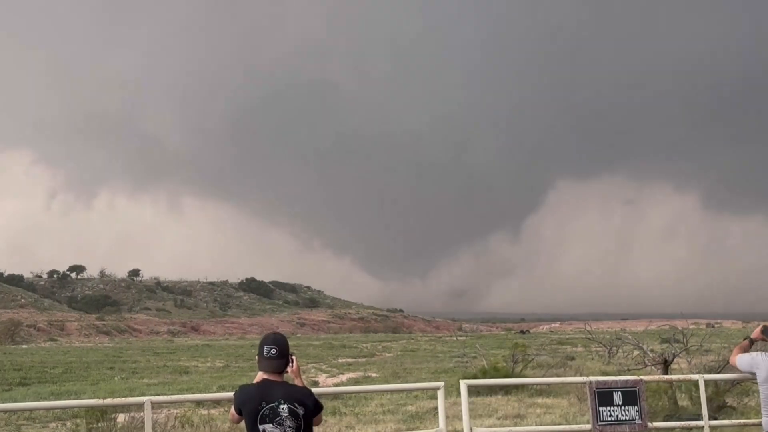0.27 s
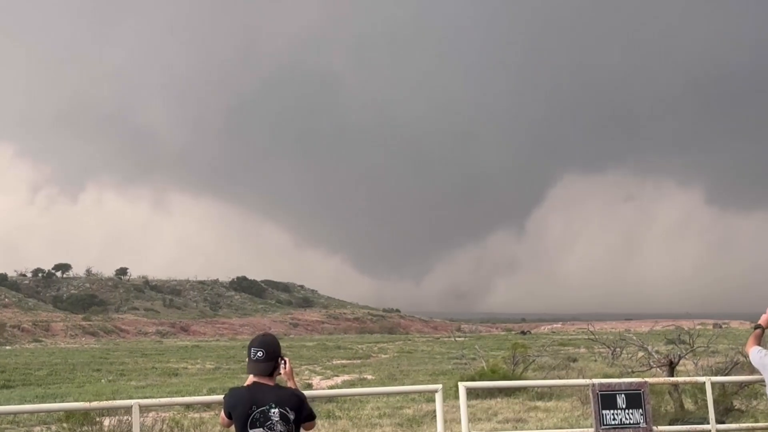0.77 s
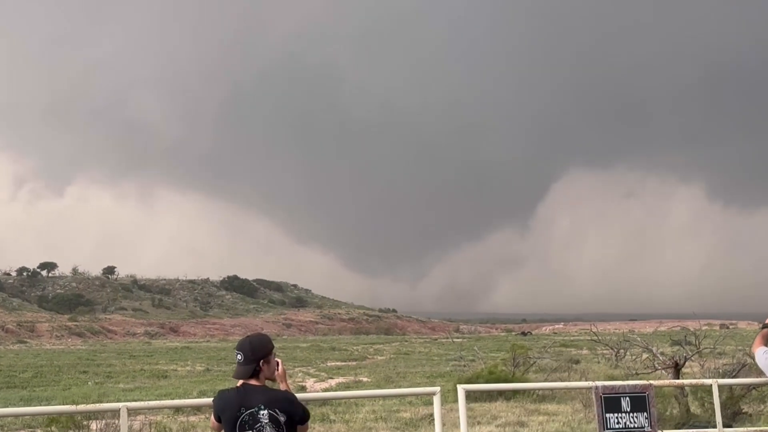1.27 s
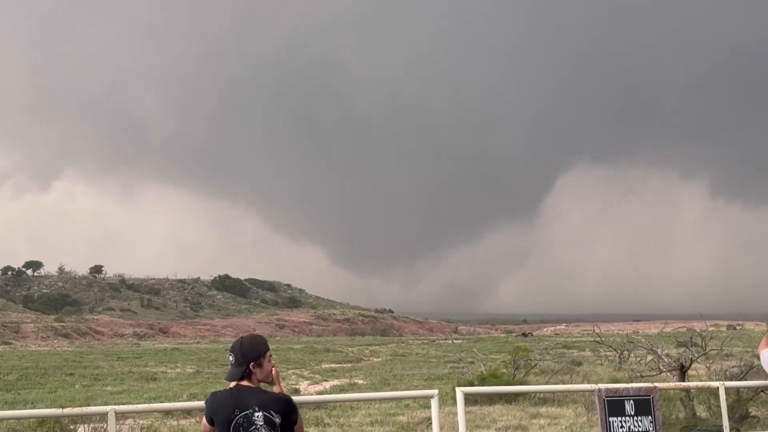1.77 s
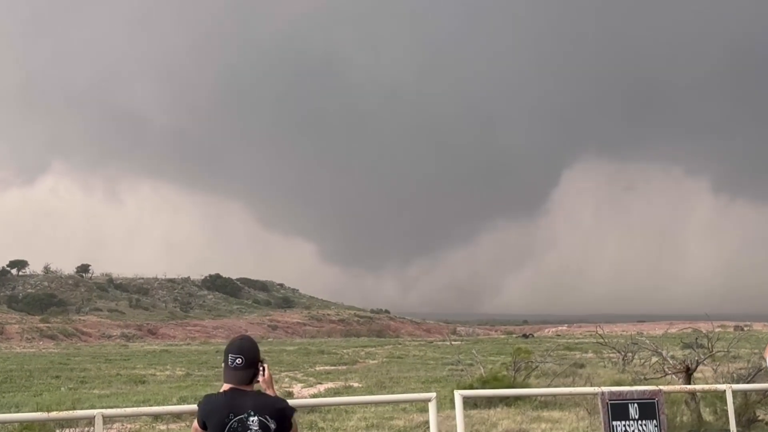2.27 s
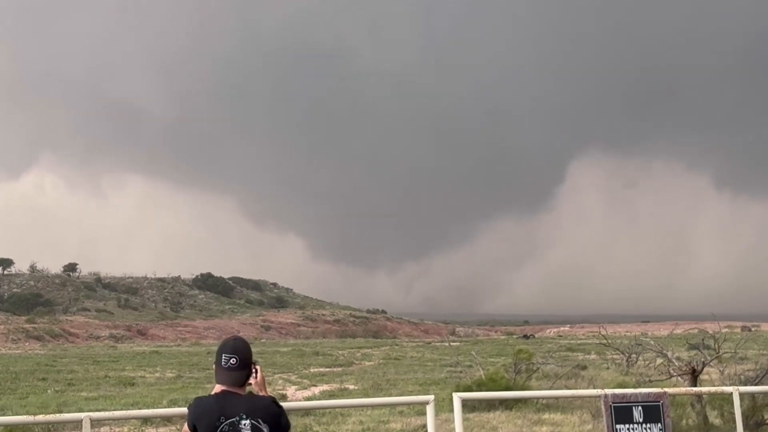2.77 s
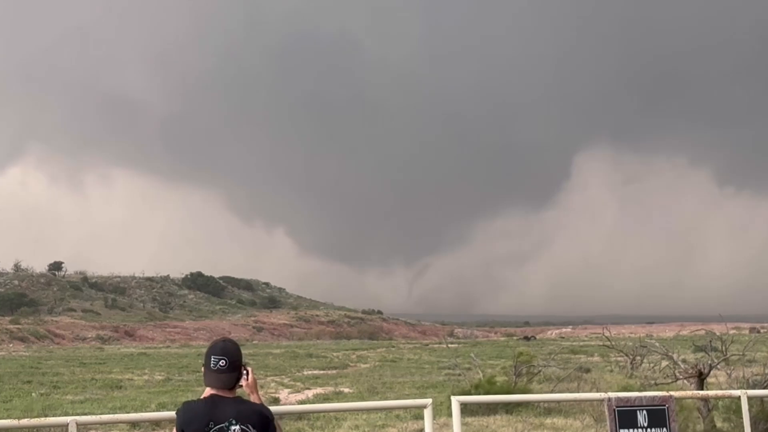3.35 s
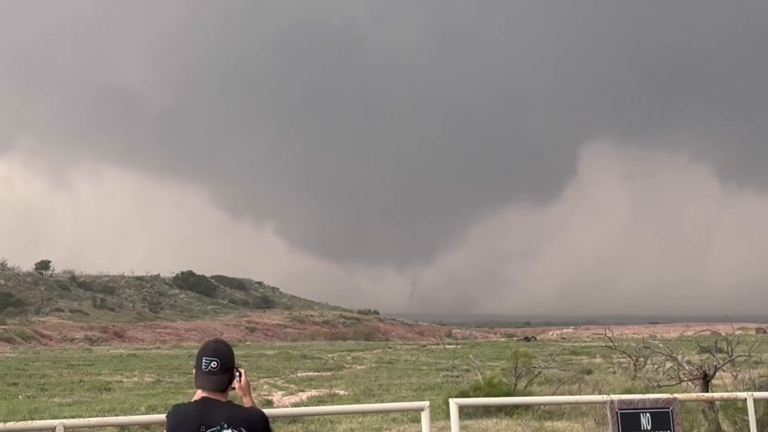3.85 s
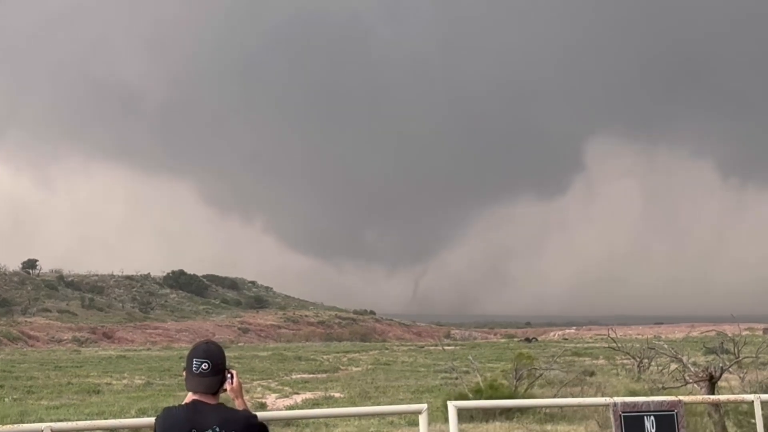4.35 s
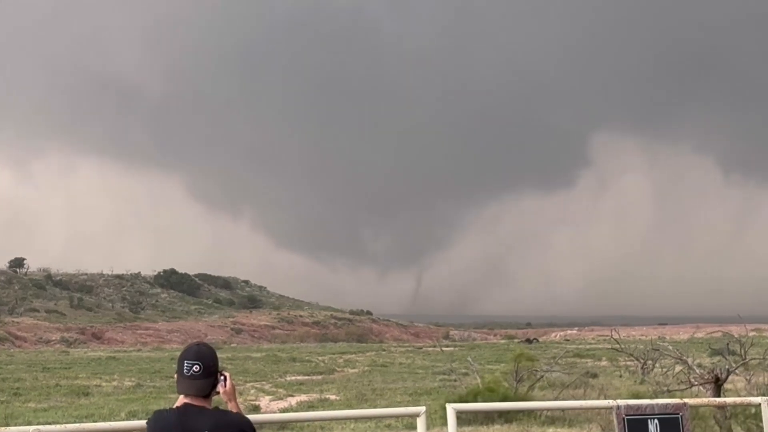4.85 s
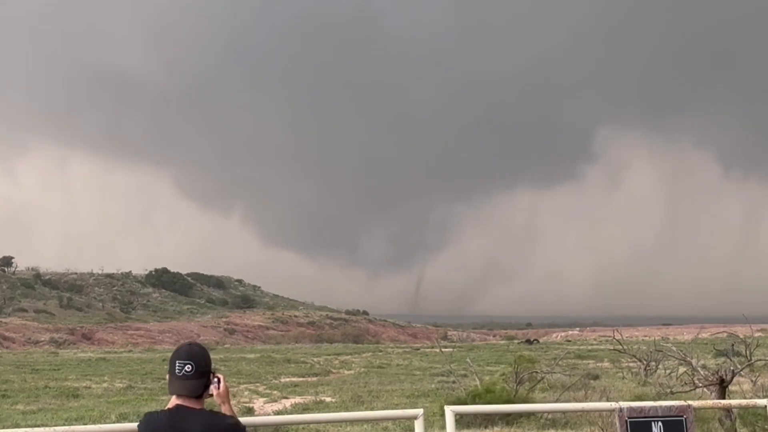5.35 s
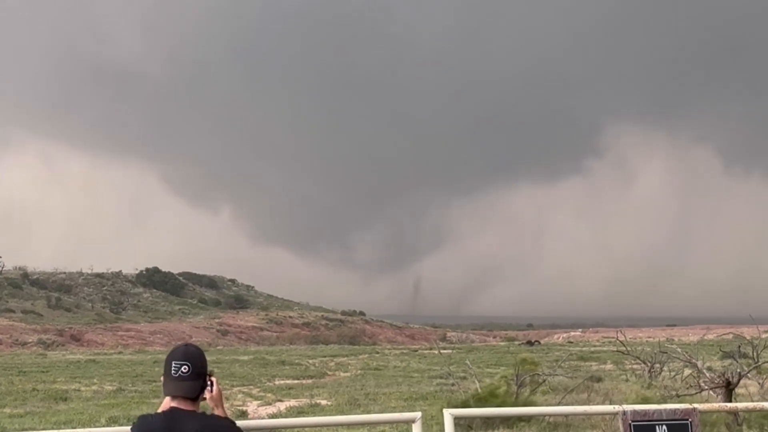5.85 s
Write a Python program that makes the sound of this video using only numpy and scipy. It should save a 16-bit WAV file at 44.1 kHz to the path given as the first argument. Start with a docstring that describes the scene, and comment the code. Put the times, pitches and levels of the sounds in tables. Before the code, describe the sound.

Storm wind blows across open grassland and rumbles unevenly on a hand-held stereo microphone. Light dry taps, like first raindrops on cloth, fall close by at the start. The wind swells into hard, popping buffets, eases while a few more taps land, then buffets again near the end. Behind it, air rushes softly over the land and grass hisses, and late on a distant bird chirps very faintly.

```python
"""Open grassland in a storm wind, on a hand-held stereo microphone.
Eddies rumble right at the ports and twice swell into hard, popping buffets. Behind them the wind
rushes over the land and hisses in the nearby grass. Light dry taps, like first raindrops on taut
cloth, fall close to the microphone; late on, a bird whistles faintly, far off."""
import sys
import numpy as np
from scipy import signal
from scipy.fft import rfft, irfft
from scipy.io import wavfile
from scipy.ndimage import uniform_filter1d, minimum_filter1d

SR = 44100
rng = np.random.default_rng(int(sys.argv[2]) if len(sys.argv) > 2 else 0)


def waveform_to_disk(signal):
    """Save audio, clipped to [-1, 1], as 16-bit WAV at the path in sys.argv[1]."""
    frames = np.transpose(np.atleast_2d(signal))
    scaled = np.clip(frames, -1, 1) * 32767
    samples = np.round(scaled).astype(np.int16)
    wavfile.write(sys.argv[1], SR, samples)


N = 269010
T = np.arange(N) / SR
HZ = np.fft.rfftfreq(N, 1 / SR)

# Wind on the microphone, how alike the two ports hear it: f/Hz, likeness/0-1
WIND_LIKENESS = [(30, .995), (48, .99), (56, .965), (64, .8), (110, .72), (300, .72), (500, .68),
                 (1000, .52)]
# Sound arriving through the air, how alike the two ports hear it: f/Hz, likeness/0-1
AIR_LIKENESS = [(300, 0.13), (700, 0.018), (1300, 0.18), (2400, 0.89), (4000, 0.91), (7000, 1),
                (10000, 0.9), (15000, .9)]
# Sound arriving through the air, its stereo balance: f/Hz, left over right/dB
AIR_PAN = [(300, 5), (700, -0.5), (1300, 3.5), (2400, 0), (4000, 0)]


def amp(db):
    """Decibels to gain."""
    return 10 ** (np.asarray(db) / 20)


def unit(x):
    """Scales to rms 1."""
    return x / np.sqrt(np.mean(x ** 2) + 1e-20)


def curve(points, hz=HZ):
    """Joins points by straight lines on a log-frequency axis."""
    f, value = np.transpose(points)
    return np.interp(np.log(hz + 1), np.log(f), value)


def fader(table, column):
    """One dB column of a timed table as a gain for each sample."""
    rows = np.array(table)
    return amp(np.interp(T, rows[:, 0], rows[:, column]))


def add(mix, s, sound):
    """Mixes a stereo sound in at time s."""
    part = mix[:, max(round(s * SR), 0):][:, :sound.shape[1]]
    part += sound[:, :part.shape[1]]


def wander(rate_hz):
    """Random drift of rms 1, with changes up to the given rate."""
    return unit(irfft(rfft(rng.standard_normal(N)) / (1 + (HZ / rate_hz) ** 4), N))


def noise(db, likeness, balance_db=0, size=N):
    """Stereo noise of rms 1 with a given spectrum and likeness of the two ports."""
    same = np.clip(curve(likeness, np.fft.rfftfreq(size, 1 / SR)), -1, 1)
    mid, side = rfft(rng.standard_normal((2, size))) * np.sqrt([1 + same, 1 - same])
    ports = np.array([(mid + side) * amp(balance_db / 2), (mid - side) * amp(-balance_db / 2)])
    return unit(irfft(ports * amp(db), size))


def steadied(x, span_s):
    """Takes the slow swells out of a noise and keeps its quick flutter."""
    power = uniform_filter1d((x ** 2).mean(0), max(int(span_s * SR), 1))
    return unit(x / np.sqrt(uniform_filter1d(power, max(int(span_s * SR / 2), 1)) + 1e-9))


def wind(rumble_db=-1.0, flutter_db=-2.0, surge_db=2.5, lumps_db=1.5, crisp_hz=270, crisp_db=-3.0):
    """At the ports, large eddies throb deeply; smaller ones flutter, the smallest most raggedly."""
    # Wind strength at the microphone: t/s, rumble level/dB, flutter level/dB
    gusts = [(0.0, -22.5, -27.0), (0.07, -25, -27), (0.15, -16.5, -23.5), (0.24, -24, -25),
             (0.4, -23, -27.3), (0.66, -23, -24.3), (0.8, -22, -23), (1.03, -28, -27), (1.15, -18.4, -25.6),
             (1.24, -24.5, -27.9), (1.42, -16.5, -27.5), (1.56, -26.5, -30), (1.8, -22.5, -30),
             (1.93, -18.5, -27), (2.0, -26, -27), (2.07, -19.5, -22), (2.21, -24, -24.5),
             (2.29, -16.5, -23), (2.44, -16, -21.5), (2.5, -20, -25), (2.57, -15, -21), (2.7, -15, -22),
             (2.76, -17, -23), (2.795, -9, -21), (2.85, -15, -22), (2.95, -16, -22), (3.13, -21.5, -25),
             (3.28, -18, -24), (3.37, -17.5, -24), (3.52, -19, -22.5), (3.85, -23.5, -27),
             (4.02, -25.5, -28.5), (4.13, -19.5, -24), (4.21, -25, -22), (4.275, -15.5, -21.5),
             (4.34, -25, -27.7), (4.8, -22, -29.5), (5.16, -20.5, -31), (5.27, -18.5, -26),
             (5.38, -24.5, -29), (5.49, -20, -23), (5.64, -24, -28.5), (5.76, -20.5, -22.5),
             (5.9, -22, -23), (5.98, -29, -26), (6.06, -22, -20.5)]
    # Spectrum of the large eddies: f/Hz, relative level/dB
    rumble_spectrum = [(10, -42), (22, -25), (28, -13), (36, -5.5), (43, -5.5), (49, -2.5), (55, 4.5),
                       (60, 1.5), (69, -9.5), (80, -8.5), (100, -16), (160, -34), (400, -70), (1500, -120)]
    # Spectrum of the smaller eddies: f/Hz, relative level/dB
    flutter_spectrum = [(30, -10), (70, -3), (110, 2.5), (160, -0.5), (230, -7), (320, -13.5), (470, -23),
                        (650, -39), (1000, -37.5), (2500, -91.5), (8000, -100)]
    rumble = steadied(noise(curve(rumble_spectrum), WIND_LIKENESS), span_s=0.092)
    rumble *= unit(amp(surge_db * wander(rate_hz=27.4)))
    lumps = wander(rate_hz=25)
    flutter = steadied(noise(curve(flutter_spectrum), WIND_LIKENESS), span_s=0.031)
    flutter *= unit(amp(lumps_db * lumps))
    soft = irfft(rfft(flutter) / (1 + (HZ / crisp_hz) ** 6), N)
    ragged = unit(amp(2.5 * np.clip(lumps, -2, 2)))
    crisp = amp(crisp_db) * (flutter - soft) * ragged
    return (amp(rumble_db) * rumble * fader(gusts, column=1)
            + amp(flutter_db) * (soft + crisp) * fader(gusts, column=2))


def grass(rush_db=-43, hiss_db=-55.5, usual_breeze_db=-53.5, stir_db=1.03, crackle_db=0.3):
    """A broad rush from far off and a fine, crackling hiss of nearby blades swell with the breeze."""
    # Wind strength over the land: t/s, far level/dB, near level/dB
    breeze = [(0, -49, -52), (.48, -59.5, -61), (.54, -52.5, -58), (.8, -54.5, -59.5), (1.48, -58, -59),
              (1.66, -63, -64), (1.9, -53, -57), (1.98, -60, -61.5), (2.32, -51.5, -54), (2.38, -56, -56.5),
              (2.5, -55.5, -55), (2.76, -48, -51), (2.96, -49, -52), (3.2, -62, -64), (3.38, -52, -50.5),
              (3.72, -54.5, -53), (3.81, -57.5, -61), (3.9, -63, -61.5), (4.24, -46, -53),
              (4.43, -59.5, -66), (4.54, -58, -55.5), (4.9, -62.5, -58.5), (5.32, -62, -61.3),
              (5.5, -60.5, -59), (5.65, -58.5, -56), (5.84, -67, -63), (6.06, -53.5, -63)]
    # Spectrum of the distant rush: f/Hz, relative level/dB
    rush_spectrum = [(100, -19), (300, 2.5), (500, 16), (750, 5), (1000, 4.5), (1350, 1), (1700, -3.5),
                     (2400, -10), (3200, -14.5), (5000, -19), (9000, -24), (16000, -46.5)]
    # Spectrum of the nearby blades: f/Hz, relative level/dB
    hiss_spectrum = [(300, 4), (1000, 10.5), (2000, 4), (3500, -2.5), (5000, -5.5), (7000, -3.5),
                     (8500, -6), (10000, -5), (11500, -4.5), (13000, -8), (15000, -6), (16000, -20.5)]
    stir = amp(stir_db * wander(rate_hz=13) - usual_breeze_db)
    far = (stir * fader(breeze, column=1)) ** 0.85  # dB of sound for each dB of breeze
    near = (stir * fader(breeze, column=2)) ** 0.79
    rush = noise(curve(rush_spectrum), AIR_LIKENESS, curve(AIR_PAN)) * amp(1.1 * wander(rate_hz=38))
    hiss = noise(curve(hiss_spectrum), AIR_LIKENESS, curve(AIR_PAN)) * amp(0.77 * wander(rate_hz=160))
    crackle = unit(amp(crackle_db * wander(rate_hz=700)))
    return amp(rush_db) * rush * far + amp(hiss_db) * hiss * crackle * near


def taps(rise_s=0.00063, ring_rise_s=0.0033, decay_s=0.016, tail_s=0.046, tail_db=-17, low_hz=1100):
    """Close by, each tap is a grainy spatter with a faint tail and a hollow ring of damped modes."""
    # Taps, in relative levels: t/s, spatter/dB, treble/dB, ring/dB, lift of the modes below low_hz/dB
    hits = [(.018, -36, -26, -51, 3), (0.118, -43.5, -14, -46, -5), (.154, -41.5, -7, -38, -4),
            (0.173, -33, -26.5, -41, 11), (.304, -45, -30, -62, 2), (0.377, -46.5, -26, -66, 0),
            (0.401, -45, -28, -60, 0), (.52, -51, -16, -41, 2), (0.556, -41, -21, -42, 5),
            (.624, -51, -27, -50, 6), (.772, -38, -36, -49, 11), (0.799, -48, -23, -58, 0),
            (.855, -48.5, -17, -62, 0), (.926, -60, -17, -62, 0), (.949, -48, -29, -60, 0),
            (1.026, -56, -21, -60, 0), (1.48, -32, -38, -30.5, 1), (1.574, -44.5, -32, -61, 0),
            (1.61, -39.5, -23, -31.5, -10), (1.708, -37, -41, -43, 4), (1.728, -50, -24, -50, 10),
            (3.54, -29.5, -31.5, -37.5, 10.5), (3.775, -50.5, -5, -60, 0), (3.814, -36, -31, -37.5, -14),
            (3.85, -42.5, -34, -51, 14), (3.926, -30.5, -26, -30, 0), (4.124, -32.5, -30, -45, -1),
            (4.136, -40, -21, -57, 0), (4.316, -30.5, -32.5, -30, 4), (4.495, -45, -35, -43.5, 0)]
    # Modes that a tap rings with: f/Hz, relative level/dB, t60/s
    modes = [(560, -3, .04), (865, 1.5, .04), (1010, -4.5, .03), (1305, 6, .04), (1430, -5, .034),
             (1770, -13.5, .04), (2295, -15, .045), (3590, -24, .05), (4340, -22, .06), (5220, -21, .06),
             (7550, -21, .05)]
    # Spectrum of the spatter: f/Hz, relative level/dB
    spatter_spectrum = [(150, -9), (500, -1.5), (900, 7.5), (1400, 7), (2000, 2.5), (2900, -4.5),
                        (3600, -4), (5000, -7), (7500, -9.5), (9500, -14.5), (12000, -19), (15500, -24)]
    out, size = np.zeros((2, N)), 2 ** 13
    hz, t = np.fft.rfftfreq(size, 1 / SR), np.arange(size) / SR
    treble_shelf = hz ** 2 / (hz ** 2 + 2800 ** 2)
    attack = 1 - np.exp(-t / rise_s)
    envelope = attack * (np.exp(-(t / decay_s) ** 1.25) + amp(tail_db) * np.exp(-t / tail_s))
    build = 1 - np.exp(-(t / ring_rise_s) ** 2)  # the ring builds just after the spatter
    for s, db, treble_db, ring_db, low_db in hits:
        colour_db = curve(spatter_spectrum, hz) + 0.9 * (treble_db + 29.0) * treble_shelf
        grain = unit(amp(0.57 * unit(uniform_filter1d(rng.standard_normal(size), size=40))))
        spatter = grain * noise(colour_db, AIR_LIKENESS, curve(AIR_PAN, hz), size=size)
        detune = rng.uniform(0.99, 1.025)  # each tap lands elsewhere and rings a little higher or lower
        ring = np.zeros(size)
        for f, mode_db, t60 in modes:
            fade = amp(mode_db + low_db * (f < low_hz) - 60 * t / t60)
            ring += fade * np.sin(2 * np.pi * (detune * f * t + rng.random()))
        knock = amp(ring_db) * build * ring * amp([[2.5], [0]])  # a little to the left
        add(out, s - .001, amp(db - 4.5) * envelope * spatter + knock)
    return out


def buffets(rise_s=0.0016, lead_s=.01, lag_s=0.00929, lag_hz=190, knee_share=0.023, gain_db=7.0):
    """An eddy hits the ports as a quick swell of low noise that falls off steeply above its edge."""
    # Bursts of turbulence: onset t/s, relative level/dB, nominal decay/s, upper edge f/Hz
    bursts = [(1.983, -25.5, 0.011, 680), (2.087, -24.5, 0.024, 416), (2.362, -22, 0.009, 294),
              (2.45, -18, 0.01, 710), (2.527, -19.5, 0.017, 600), (2.544, -26, .005, 800),
              (2.568, -22, 0.018, 640), (2.596, -25, 0.015, 680), (2.633, -23.5, 0.021, 480),
              (2.858, -13, 0.019, 475), (2.886, -21, 0.02, 570), (2.903, -24.5, 0.03, 480),
              (2.978, -21, 0.0064, 1210), (3.014, -25.5, 0.0097, 810), (3.199, -31.5, 0.014, 1050),
              (3.232, -26.5, 0.027, 500), (3.258, -21, 0.0047, 603), (5.312, -30, 0.0079, 280),
              (5.761, -23.5, 0.012, 405), (5.813, -18.5, 0.012, 610), (5.845, -21.5, 0.023, 355),
              (5.870, -21, 0.0065, 843), (6.002, -25, 0.022, 423)]
    out, size = np.zeros((2, N)), 2 ** 13
    hz, t = np.fft.rfftfreq(size, 1 / SR) + 1, np.arange(size) / SR
    phase_lag = 2 * np.pi * lag_s * lag_hz * np.arctan(hz / lag_hz)  # the deep part comes last
    age = np.maximum(t - lead_s, 0)
    low_cut = 1 / np.hypot(1, (80 / hz) ** 3)
    for s, db, decay_s, edge_hz in bursts:
        shape = low_cut / np.hypot(1, hz / (knee_share * edge_hz)) / np.hypot(1, (hz / edge_hz) ** 3.3)
        eddy = steadied(noise(20 * np.log10(shape), WIND_LIKENESS, size=size), span_s=0.36)
        swell = (1 - np.exp(-age / rise_s)) * np.exp(-(age / (1.5 * decay_s)) ** 0.92)
        high_cut = 1 / np.hypot(1, (hz / (2 * edge_hz)) ** 4)
        thump = irfft(rfft(eddy * swell) * high_cut * np.exp(-1j * phase_lag))
        add(out, s - lead_s, amp(db + gain_db) * thump)
    return out


def pops(rise_s=0.0051, glide_s=0.00662, roughness=0.29, port_spread_turns=0.058):
    """A tight eddy bursts on the ports: a few uneven pressure swings that sink from a pop to a thud."""
    # Tight eddies inside the gusts: t/s, level/dB, decay/s, starting f/Hz, final f/Hz
    eddies = [(1.985, -19.5, 0.0086, 490, 85), (2.093, -11, 0.0087, 420, 101),
              (2.119, -13, 0.0064, 397, 120), (2.155, -23, 0.0095, 370, 110),
              (2.221, -14.5, .009, 390, 120), (2.268, -16.5, 0.0093, 380, 191),
              (2.366, -18, 0.014, 345, 150), (2.452, -6, 0.028, 518, 120.5),
              (2.463, -3.5, 0.021, 128, 88.5), (2.514, -10, .009, 340, 85), (2.531, -8, 0.009, 518, 129),
              (2.534, -3, 0.012, 195, 106), (2.543, -7.5, 0.0042, 880, 295),
              (2.552, -11.5, 0.016, 482, 122), (2.573, -8, 0.029, 410, 123), (2.594, -3, 0.013, 363, 132),
              (2.603, -4, 0.011, 634, 110), (2.639, -13, 0.016, 515, 180), (2.864, -5.5, 0.019, 417, 119),
              (2.869, 0, 0.018, 160, 105), (2.884, -3, 0.0078, 594, 149), (2.893, -6, 0.0043, 700, 200),
              (2.9, -8, 0.04, 247, 97), (2.974, -11, 0.0081, 305, 100), (2.986, -13, 0.034, 493, 129),
              (3.062, -12.5, 0.0069, 376, 140), (3.095, -17, .007, 360, 140),
              (3.122, -8.5, 0.014, 308, 120), (3.257, -12, 0.0091, 325, 100), (4.18, -16, 0.013, 380, 130),
              (4.25, -17, 0.013, 342, 90), (5.421, -23, 0.0088, 380, 150), (5.461, -17, 0.021, 470, 120),
              (5.689, -20, 0.011, 380, 170), (5.718, -18, 0.015, 338, 109), (5.76, -16.5, 0.017, 377, 110),
              (5.816, -10, 0.012, 460, 301), (5.831, -6, 0.015, 844, 200), (5.833, 2, .013, 196, 95),
              (5.862, -11, 0.015, 356, 220), (5.871, -2.5, 0.023, 151, 91), (5.881, 0, 0.012, 525, 100),
              (5.941, -11, 0.015, 250, 110.6), (6.006, -10.5, 0.0075, 403, 130)]
    out, size = np.zeros((2, N)), 2 ** 12
    hz, t = np.fft.rfftfreq(size, 1 / SR), np.arange(size) / SR
    rough_spectrum_db = -10 * np.log10(1 + (hz / 220) ** 6)
    for s, db, decay_s, start_hz, end_hz in eddies:
        pitch_hz = end_hz + (start_hz - end_hz) * np.exp(-(t / glide_s) ** 1.63)
        turns = np.cumsum(pitch_hz) / SR + rng.random()
        swings = np.sin(2 * np.pi * (turns + port_spread_turns * rng.standard_normal((2, 1))))
        swell = (1 - np.exp(-(t / rise_s) ** 2)) * np.exp(-(t / decay_s) ** 2)
        rough = roughness * noise(rough_spectrum_db, WIND_LIKENESS, size=size)
        add(out, s, amp(db) * swell * (swings + rough))
    return out


def swishes(width_octaves=0.4):
    """A passing eddy draws a soft, narrow band of hiss from a patch of grass."""
    # Eddies crossing the grass: peak t/s, half length/s, level/dB, centre f/Hz
    passes = [(2.76, .05, -47, 850), (4.74, 0.073, -62, 2000), (5.542, .07, -61, 2050),
              (5.654, .05, -58, 1900)]
    out = np.zeros((2, N))
    for s, half_s, db, centre_hz in passes:
        octaves_off = np.log2((HZ + 1) / centre_hz)
        band_db = -20 * np.log10(1 + (octaves_off / width_octaves) ** 4)
        swell = np.exp(-((T - s) / half_s) ** 2 / 2)
        out += amp(db) * swell * noise(band_db, AIR_LIKENESS)
    return out


def bird(gain_db=-8, fade_s=0.0068, blur_hz=220):
    """A far bird's faint gliding chirps, blurred by distance and moving air into narrow bands."""
    # Whistled glides, one list a chirp: t/s, f/Hz, relative level/dB
    chirps = [
        [(4.503, 2850, -62), (4.517, 3000, -57), (4.54, 3100, -66)],
        [(4.508, 3700, -61), (4.525, 3800, -58), (4.565, 3780, -61), (4.6, 3900, -62), (4.63, 4000, -68)],
        [(4.55, 4550, -68), (4.6, 4650, -62), (4.72, 4500, -69)],
        [(5.9, 4100, -72), (5.945, 4100, -65), (5.98, 4000, -67), (6.02, 4120, -62), (6.09, 4050, -65)],
        [(5.985, 2800, -68), (6.03, 2950, -62), (6.09, 3050, -63)],
    ]
    out = np.zeros((2, N))
    for chirp in chirps:
        s, hz, db = np.transpose(chirp)
        phase = 2 * np.pi * np.cumsum(np.interp(T, s, hz)) / SR
        tone = wander(blur_hz) * np.sin(phase) + wander(blur_hz) * np.cos(phase)
        gate = np.clip(np.minimum(T - s[0], s[-1] - T) / fade_s, 0, 1)
        out += gate * amp(np.interp(T, s, db) + gain_db) * tone
    return out


def limiter(x, ceiling, size):
    """The gain dips smoothly around any peak above the ceiling."""
    needed = ceiling / np.maximum(abs(x).max(0), ceiling)
    held = minimum_filter1d(needed, 2 * size)
    return x * uniform_filter1d(uniform_filter1d(held, size), size)


def scene():
    """Wind on the microphone, with the land and its small sounds behind it."""
    return wind() + buffets() + pops() + grass() + swishes() + taps() + bird()


def record(dry):
    """Low cut, a left-right phase offset in the top treble that widens the hiss, limiter, band limit."""
    low_cut_hz, band_limit_hz = 29, 15700
    offset_above_hz, treble_offset_s = 7900, .000312
    low_cut = HZ ** 4 / np.hypot(HZ ** 4, low_cut_hz ** 4)
    phase = np.pi * np.maximum(HZ - offset_above_hz, 0) * treble_offset_s
    widened = irfft(rfft(dry) * low_cut * np.exp(1j * np.array([-phase, phase])), N)
    limited = limiter(widened, ceiling=.925, size=200)
    band_limit = signal.firwin(511, band_limit_hz, window=("kaiser", 9), fs=SR)
    return signal.oaconvolve(limited, band_limit[None], "same")


dry = scene()
out = record(dry)
waveform_to_disk(out)
```